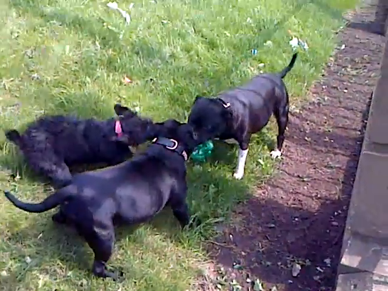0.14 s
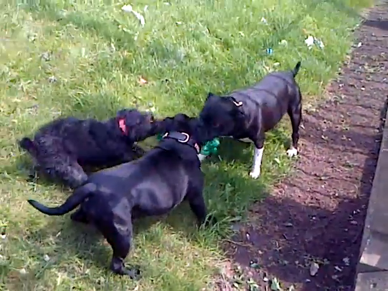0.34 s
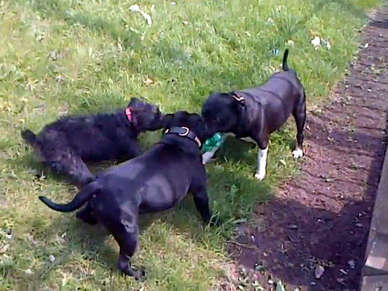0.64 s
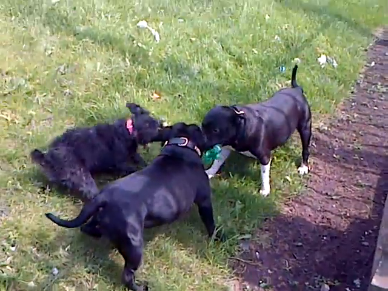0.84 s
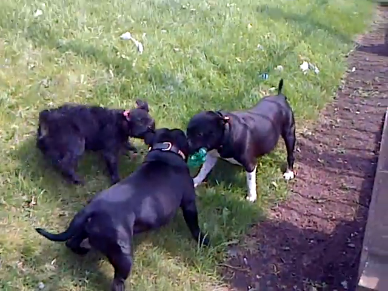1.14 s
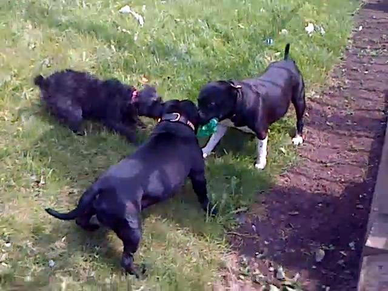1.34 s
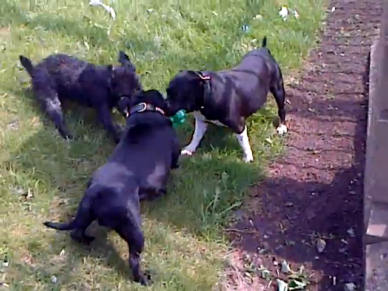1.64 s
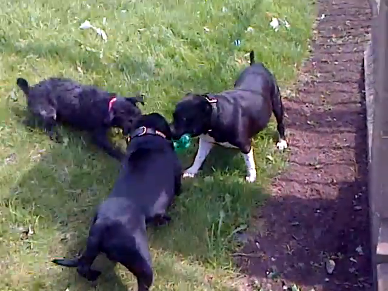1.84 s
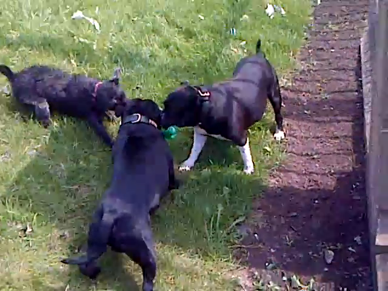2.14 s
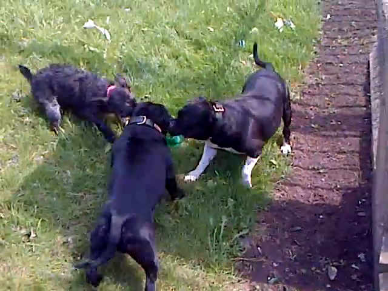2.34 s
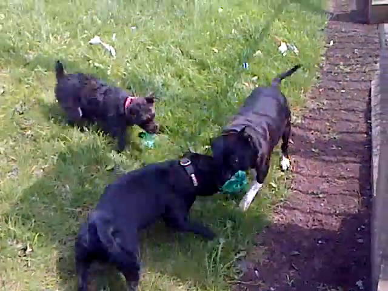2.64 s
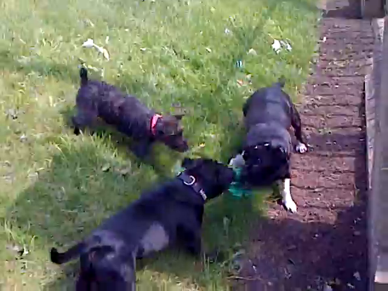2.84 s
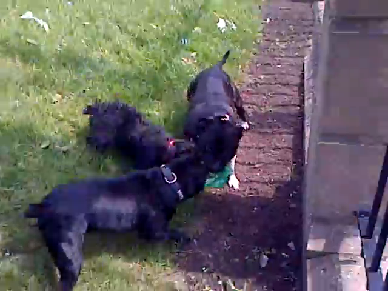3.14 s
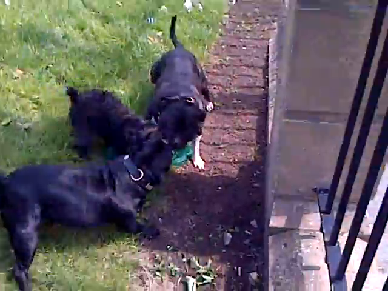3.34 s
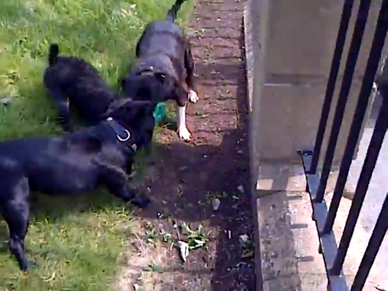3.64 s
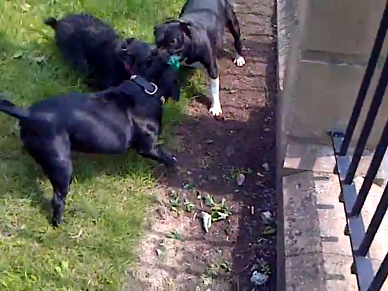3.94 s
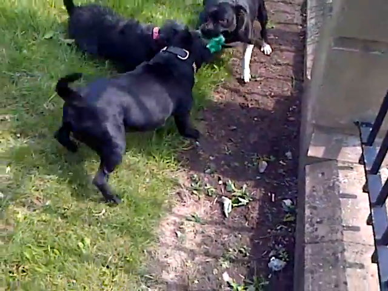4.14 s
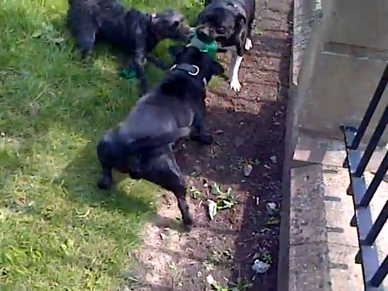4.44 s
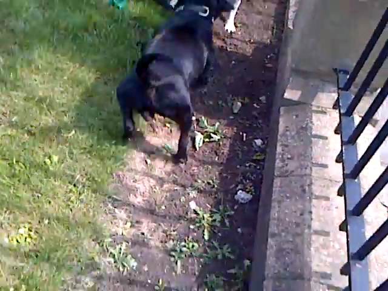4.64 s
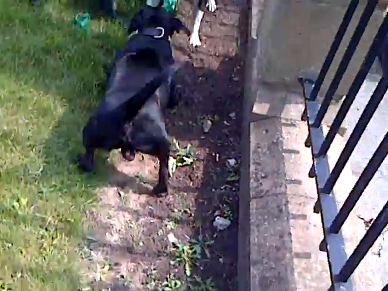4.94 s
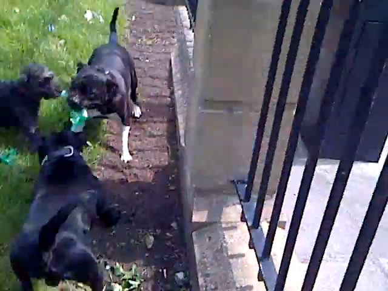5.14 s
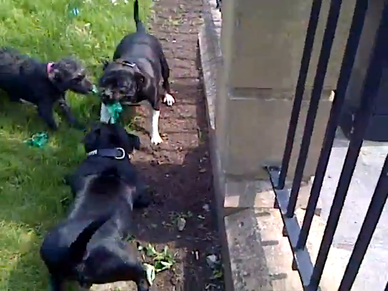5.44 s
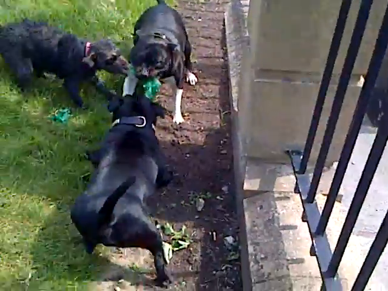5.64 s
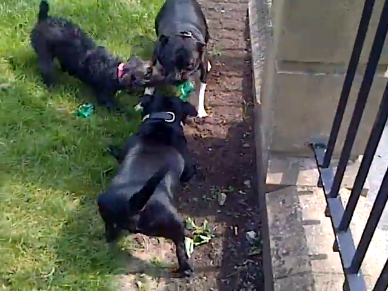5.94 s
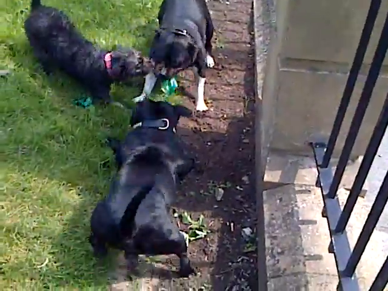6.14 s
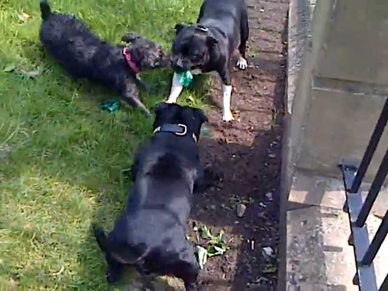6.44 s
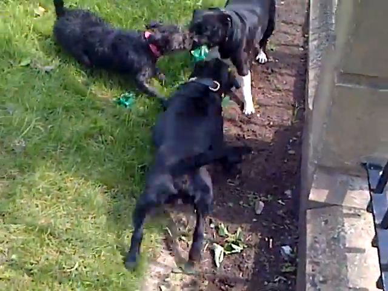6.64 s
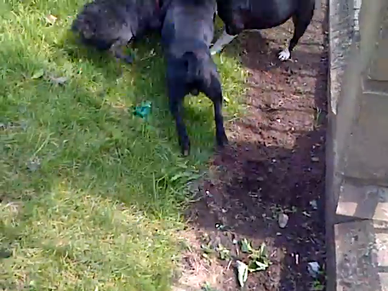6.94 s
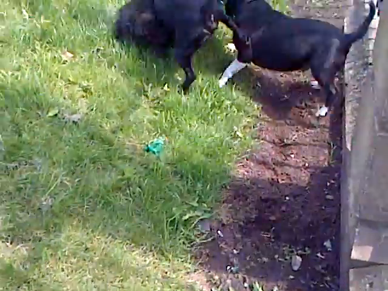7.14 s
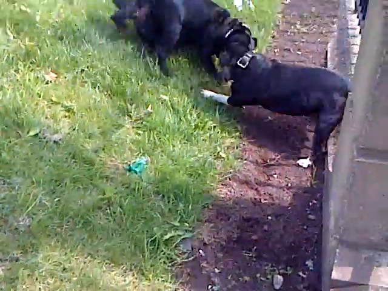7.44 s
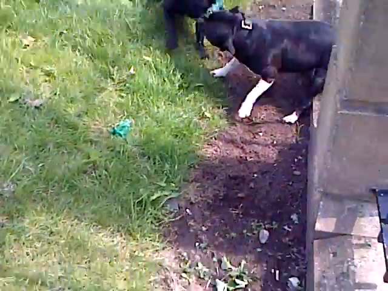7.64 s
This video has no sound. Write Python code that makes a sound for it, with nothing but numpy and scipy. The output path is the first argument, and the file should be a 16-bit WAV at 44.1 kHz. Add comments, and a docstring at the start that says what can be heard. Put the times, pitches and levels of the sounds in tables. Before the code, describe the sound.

Sharp plastic cracks and crinkles as dogs tug and chew a bottle, with low growls, soft paw thuds and a snort over traffic.

```python
"""Sharp plastic cracks and crinkle over a wash of road traffic, with low growls and a closing snort.
Three dogs tug and chew a bottle on a lawn by a stone wall. Each bite snaps dents that ring the thin
plastic; teeth scrape, paws thud. Growls are vocal-fold flaps in the throat, the snort is air in the nose.
A narrow-band microphone a few metres away overloads on the hardest cracks."""
import sys
import numpy as np
from scipy import signal
from scipy.io import wavfile
from scipy.ndimage import uniform_filter1d

SR = 44100
rng = np.random.default_rng(int(sys.argv[2]) if len(sys.argv) > 2 else 0)


def transcribe(signal):
    """Save signal, clipped to [-1, 1], as a 16-bit WAV file at the path in sys.argv[1]."""
    frames = np.atleast_2d(signal).T
    limited = np.clip(frames, -1, 1)
    pcm = np.round(limited * 32767).astype(np.int16)
    wavfile.write(sys.argv[1], SR, pcm)


N = 343980
SLIP_DRAWS = 11  # random numbers per slip: timing, sign, a bend for each of 9 rings


def gain_of(db):
    return 10 ** (np.asarray(db) / 20)


def unit_rms(x):
    return x / np.sqrt(np.mean(x ** 2) + 1e-20)


def log_interp(points, hz):
    f, value = np.transpose(points)
    return np.interp(np.log(hz + 1), np.log(f + 1), value)


def add(mix, start_s, sound):
    part = mix[round(start_s * SR):][:len(sound)]
    part += sound[:len(part)]


def filtered(x, hz, kind, order):
    return signal.sosfilt(signal.butter(order, np.clip(hz, 20, 20000), kind, fs=SR, output="sos"), x)


def resonate(x, hz, width_hz, stages=1):
    """Unity-gain resonance: shift hz to zero, smooth, shift back."""
    carrier = np.exp(2j * np.pi * np.cumsum(hz * np.ones(len(x))) / SR)
    pole = np.exp(-np.pi * width_hz / SR)
    for _ in range(stages):
        x = 2 * (carrier * signal.lfilter([1 - pole], [1, -pole], x / carrier)).real
    return x


def microphone(x):
    """Voice-band capsule: a low shelf either side of the band, then a steep top cut."""
    x = filtered(x, 191.4, "high", order=10) + gain_of(-30) * x
    x = filtered(x, 3340, "low", order=6) + gain_of(-18) * x
    return filtered(x, 7800, "low", order=16)


def traffic():
    """Tyre noise blending a dull and a hissing car, plus engine drone."""
    # background wash, ducking abruptly after the loudest crack and creeping back:
    # t/s, level/dB, hissing share/0-1
    background = [(0, -27.5, 0), (0.68, -25, 0), (.96, -29.5, 0.4), (1.3, -30.5, 0.6), (1.6, -29, 0.82),
                  (2.06, -23.5, 1), (2.65, -27.5, 0.6), (3.401, -31.5, 0.96), (3.751, -37.5, 0.6),
                  (4.408, -40.5, 1), (4.839, -44, 0.98), (5.399, -41.5, 1), (6.263, -45.5, 0.3),
                  (6.277, -63.5, 0.3), (6.901, -55.5, 0.98), (7.201, -47, 0.87), (7.8, -43, 0.5)]
    # dull car spectrum: f/Hz, density/dB
    dull_car = [(100, -13), (190, -17), (300, -7), (600, -7.5), (990, -6), (1300, -8.5), (2100, -10),
                (2800, -11), (3500, -28.5), (5800, -27.5), (7500, -67.5)]
    # hissing car spectrum: f/Hz, density/dB
    hissing_car = [(100, -10), (190, -21.5), (330, -5), (500, -12.5), (850, -10), (1500, -11.5),
                   (2900, -15.5), (4000, -17), (4700, -26.5), (5500, -33.5), (7500, -59)]
    # engine drone: f/Hz, width/Hz, level/dB re tyre noise
    engine = [(199.8, 11, -31), (326, 42, -16)]
    frames, hz = N // 128 + 5, np.fft.rfftfreq(512, 1 / SR)
    real, imag, patches, drifts = rng.standard_normal((frames, 257, 4)).T
    drifts = unit_rms(uniform_filter1d(uniform_filter1d(drifts, size=14, axis=1), size=8, axis=0))
    patches = unit_rms(uniform_filter1d(uniform_filter1d(patches, size=3, axis=0), size=36, axis=1))
    at_s, db, share = np.transpose(background)
    share = np.interp(np.arange(frames) * 128 / SR, at_s, share)
    dull_db, hiss_db = log_interp(dull_car, hz)[:, None], log_interp(hissing_car, hz)[:, None]
    colour = gain_of((1 - share) * dull_db + share * hiss_db)
    spectra = (real + 1j * imag) * colour / np.linalg.norm(colour, axis=0) * gain_of(2 * patches + drifts)
    tyres = unit_rms(signal.istft(spectra, nperseg=512, noverlap=384)[1][:N])
    drone = sum(gain_of(g) * unit_rms(resonate(rng.standard_normal(N), f, w)) for f, w, g in engine)
    return (tyres + drone) * gain_of(np.interp(np.arange(N) / SR, at_s, db))


def yard_echoes(x, t60_s=.063):
    """Sparse random-sign reflections from ground, wall and railings."""
    taps = np.zeros(8000)
    at = np.arange(120, 7980, 20) + rng.integers(0, 20, 393)
    taps[at] = rng.choice([-1., 1.], len(at)) * gain_of(-60 * at / SR / t60_s)
    return signal.oaconvolve(x, taps / np.linalg.norm(taps))[:N]


def paws(push_t60_s=.032, soil_t60_s=.13):
    """Each landing on turf: a dull push with a crumbly tail."""
    # landings: t/s, level/dB, f/Hz
    landings = [(0.458, -23.5, 326), (4.144, -23, 366), (4.16, -24, 257), (4.207, -17, 324),
                (4.235, -17.5, 354), (4.261, -20, 482), (6.834, -38, 596), (6.871, -39.5, 523),
                (7.352, -28, 443), (7.375, -23, 328), (7.484, -29, 353)]
    out, t = np.zeros(N), np.arange(2000) / SR
    soils = filtered(rng.standard_normal((len(landings), len(t))), 1100, "low", order=4)
    for (at_s, db, hz), soil in zip(landings, soils):
        push = np.sin(2 * np.pi * hz * t) * gain_of(-60 * t / push_t60_s)
        crumble = .38 * unit_rms(resonate(soil, hz, 500)) * gain_of(-60 * t / soil_t60_s)
        add(out, at_s, gain_of(db) * (push + crumble) * np.minimum(t / .0011, 1))
    return out


def vocal_folds(t, pulse_hz, breath, leak):
    """Uneven flaps, each passing a puff of noisy air."""
    jitter = .29 * unit_rms(uniform_filter1d(rng.standard_normal(len(t)), 300))
    cycles = np.cumsum(pulse_hz * (1 + jitter)) / SR
    flaps = np.diff(np.floor(cycles), prepend=0) * gain_of(3.9 * rng.standard_normal(len(t)))
    puffs = (leak + np.exp(-(cycles % 1) / .3)) * rng.standard_normal(len(t))
    return (1 - breath) * unit_rms(flaps) + breath * unit_rms(puffs)


def growls(swell_db=18):
    """Slow flaps ring one broad throat resonance behind clenched teeth."""
    # growls: t/s, length/s, mid level/dB, throat f/Hz
    calls = [(.3, 0.45, -34, 850), (1.949, 1, -27.5, 670), (6.941, 0.15, -48.5, 790)]
    out = np.zeros(N)
    for at_s, length_s, db, hz in calls:
        t = np.arange(0, length_s, 1 / SR)
        throat = resonate(vocal_folds(t, pulse_hz=110, breath=.6, leak=.5), hz, 380, stages=2)
        arch_db = -swell_db * (2 * t / length_s - 1) ** 2
        add(out, at_s, unit_rms(throat) * gain_of(db + arch_db) * signal.windows.tukey(len(t), .1))
    return out


def snort():
    """Fluttering blast through the nose; resonances rise as the nostrils flare."""
    # blast: t/s, level/dB, nostril opening/factor on f
    blast = [(7.574, -39, 0.51), (7.6, -25, 0.72), (7.624, -14, 0.98), (7.659, -12.5, 0.98),
             (7.686, -17.5, 1.21), (7.7, -27, 0.89), (7.731, -49, 0.64)]
    # nasal resonances: f/Hz, width/Hz, gain/dB
    formants = [(950, 420, -3.5), (1400, 820, -4), (2010, 270, 5.5), (2630, 320, 1), (4000, 310, -13)]
    at_s, db, opening = np.transpose(blast)
    out, t = np.zeros(N), np.arange(at_s[0], at_s[-1], 1 / SR)
    air = vocal_folds(t, pulse_hz=65, breath=1, leak=.7)
    opening = np.interp(t, at_s, opening)
    nose = sum(gain_of(g) * resonate(air, f * opening, w, stages=2) for f, w, g in formants)
    envelope = gain_of(np.interp(t, at_s, db)) * signal.windows.tukey(len(t), .1)
    add(out, at_s[0], unit_rms(filtered(nose, 5100, "low", order=6)) * envelope)
    return out


def scrapes():
    """Teeth rasp along the plastic: noise in one broad wall resonance."""
    # tooth strokes: t/s, length/s, level/dB, f/Hz
    strokes = [(1.624, 0.19, -35, 3000), (3.544, 0.039, -27, 3280), (3.65, 0.055, -25.5, 3200),
               (5.129, 0.15, -38, 3680), (6.1, 0.15, -36, 3370)]
    out = np.zeros(N)
    for at_s, length_s, db, hz in strokes:
        t = np.arange(0, length_s, 1 / SR)
        rasp = resonate(rng.standard_normal(len(t)), hz, 1100, stages=2)
        add(out, at_s, gain_of(db) * unit_rms(rasp) * signal.windows.tukey(len(t), .6))
    return out


def knocks(rise_s=.002, t60_s=.02):
    """Hard bites ring the bottle's air and wall together, sagging in pitch."""
    # hollow knocks: t/s, level/dB, f/Hz
    hits = [(2.513, -16, 885), (2.568, -3, 714), (4.101, -10, 795), (4.2695, -12, 890), (4.409, -6.5, 812),
            (5.2515, -10, 960), (5.2695, -16, 980), (5.287, -16.5, 960), (5.394, -22, 730),
            (5.683, -7, 795), (5.823, -12.5, 790), (5.9945, -5, 807), (6.167, -11.5, 740)]
    out, t = np.zeros(N), np.arange(1500) / SR
    for at_s, db, hz in hits:
        body = np.sin(2 * np.pi * hz * t * (1 - 4 * t))
        add(out, at_s, body * gain_of(db - 60 * t / t60_s) * np.minimum(t / rise_s, 1))
    return out


def snaps(leads_hz, focus_db_per_oct, draws, spread_s, bend_db=14, crunch_t60_s=.011):
    """Dents give way in quick slips that ring the wall; a row per snap, unit peak at the mic output."""
    # bottle wall modes: f/Hz, level/dB, t60/s
    wall_modes = [(907, 4, 0.0052), (1334, 1.5, 0.0048), (2555, 4.5, 0.0045), (3076, 3, 0.0071),
                  (3573, 3.5, 0.0082), (4250, 2, 0.0075), (5190, -13, 0.012), (5830, 0.5, 0.0023)]
    t, out = np.arange(600) / SR, np.zeros((len(draws), 1100))
    for sound, lead_hz, focus, slips in zip(out, leads_hz, focus_db_per_oct, draws):
        small = lead_hz > 3900  # quicker, less crunch
        lead_mode = (lead_hz, -3 if lead_hz < 1100 else 3, .009)
        hz, db, t60_s = np.transpose(wall_modes + [lead_mode])[:, :, None]
        db = db - focus * abs(np.log2(hz / lead_hz))
        noise = filtered(rng.standard_normal((len(slips), len(t))), max(3700, lead_hz), "low", order=8)
        crunch = noise * gain_of(-4 - 4 * small - 60 * t / crunch_t60_s)
        for k, (timing, side, *bend) in enumerate(slips):
            bend = np.array(bend)[:, None] - .5  # varies each ring's level and pitch
            decay = gain_of(db + bend_db * bend - 60 * t / t60_s)
            rings = decay * np.sin(2 * np.pi * hz * (1 + .2 * bend[::-1]) * t)
            slip = (rings.sum(axis=0) + crunch[k]) * np.minimum(t / .00056, 1)
            start_s = spread_s / (1 + small) * (k + timing * (k > 0)) / len(slips)
            add(sound, start_s, np.sign(side - .5) * gain_of(-2.5 * k) * slip)
    out = filtered(out, 750, "high", order=2)  # soft thin plastic: no bass, no sparkle
    out = filtered(out, 6200, "low", order=4)
    return out / abs(microphone(out)).max(axis=1, keepdims=True)


def crinkle(snaps_per_s=2200, squeeze_db_per_s=360, release_db_per_s=329):
    """Tiny random snaps, swelling into each bite and dying after it."""
    # jaw closures: t/s, level/dB
    bites = [(2.504, -18.5), (2.58, -23), (2.84, -18.5), (2.92, -22), (3.737, -11.5), (3.998, -24),
             (4.288, -26), (4.406, -29.5), (4.601, -29.5), (4.951, -30.5), (5.101, -30.5), (5.22, -32.5),
             (5.688, -32.5), (5.829, -31.5), (6.189, -31.5), (6.408, -52.5), (6.814, -44)]
    # tugging between bites: t/s, level/dB
    pull = [(2.4, -34), (2.7, -35.5), (3.0, -34.5), (3.3, -50.5), (5.15, -57), (6.2, -51), (6.3, -72),
            (6.92, -60.5), (6.98, -43), (7.8, -44)]
    sizes = gain_of(7.9 * np.minimum(rng.exponential(1, N), 4))
    impulses = sizes * (rng.random(N) < snaps_per_s / SR)
    kind, draws = rng.integers(0, 10, N), rng.random((10, 2, SLIP_DRAWS))
    shapes = snaps(1500 + 2200 * draws[:, 0, 0], np.full(len(draws), 1.5), draws, spread_s=.0055)
    crackle = sum(signal.oaconvolve(impulses * (kind == k), shape)[:N] for k, shape in enumerate(shapes))
    t = np.arange(0, N / SR, .002)
    pressure = gain_of(np.interp(t, *np.transpose(pull), left=-90))
    for at_s, db in bites:
        drop_db = np.maximum(squeeze_db_per_s * (at_s - t), release_db_per_s * (t - at_s))
        pressure = np.hypot(pressure, gain_of(db - drop_db))
    return unit_rms(crackle) * np.interp(np.arange(N) / SR, t, pressure)


def cracks():
    """Sharp peaks of four slips each: dents snapping in the bottle wall, then the snort's peak."""
    # dents; last row is the sharp peak of the closing snort: t/s, peak level/dB, lead ring f/Hz
    peaks = [(0.0086, -11, 3580), (0.3688, -24, 4100), (0.4298, -21.5, 4000), (0.586, -22, 4610),
             (0.758, -28, 4600), (1.327, -27.5, 5400), (1.5132, -12, 1540), (1.5608, -11.5, 1480),
             (2.4817, -19, 1560), (2.5005, -12, 2800), (2.5127, -4.5, 3060), (2.531, -5, 2010),
             (2.5675, -13, 2530), (2.5907, 0, 1520), (2.6264, -17.5, 2820), (2.6523, -17.5, 2850),
             (2.7552, -16.5, 2180), (2.8192, -2.5, 1520), (2.8267, -5.5, 2770), (2.8659, -13, 1720),
             (2.878, -7, 2750), (2.897, -7, 2090), (2.9223, -8.5, 1690), (2.9332, -7, 2820),
             (3.0178, -19, 2370), (3.075, -16.5, 2640), (3.214, -18.5, 1800), (3.2716, -12.5, 1640),
             (3.3652, -15, 2630), (3.4056, -10, 3180), (3.4474, -11.5, 2940), (3.4833, -14, 3160),
             (3.55, -14, 3130), (3.639, -9.5, 3760), (3.653, -13, 2780), (3.711, 1, 3200),
             (3.7214, -2, 2740), (3.741, -9.5, 3260), (3.7617, -2.5, 1140), (3.9173, -9.5, 2770),
             (3.9747, -5.5, 950), (3.9839, -6, 1400), (3.9946, -4.5, 2460), (4.0182, -4, 2630),
             (4.1002, -3.5, 3040), (4.1187, -11.5, 2890), (4.1303, -16, 1720), (4.145, -14, 2860),
             (4.224, -22.5, 3400), (4.2687, -9.5, 2900), (4.2764, -2.5, 1410), (4.2897, -9.5, 1880),
             (4.3017, -10.5, 2570), (4.353, -25.5, 3880), (4.3927, -21, 3170), (4.4085, -2.5, 3570),
             (4.439, -12, 3100), (4.451, -20, 2900), (4.5, -26.5, 3680), (4.5763, -5.5, 3940),
             (4.5944, -2.5, 1907), (4.613, -9.5, 2890), (4.736, -18, 1810), (4.746, -0.4, 1690),
             (4.771, -14.5, 1910), (4.839, -18, 3180), (4.9246, -13, 890), (4.938, -6, 1950),
             (4.955, -8, 4070), (4.977, -20.5, 2980), (4.9926, -17, 1810), (5.0803, -20, 3100),
             (5.099, 0, 3540), (5.1096, -13, 3020), (5.1308, -16, 1820), (5.2302, -6.5, 2940),
             (5.251, -16, 2900), (5.2692, -15.5, 3240), (5.2865, -9.5, 3070), (5.393, -20, 2930),
             (5.4149, -11.5, 3270), (5.5274, -23, 2700), (5.543, -5.5, 3160), (5.633, -22, 3000),
             (5.6665, -12.5, 3530), (5.6824, 0, 3440), (5.796, -23, 2870), (5.81, -14.5, 3070),
             (5.825, -11.5, 3350), (5.839, -11, 1660), (5.9547, -24, 3300), (5.962, -21, 3100),
             (5.9839, -20, 3280), (5.9947, -1, 3370), (6.1634, -12.5, 1620), (6.1708, -11.5, 3000),
             (6.199, -19, 3840), (6.231, 3, 3640), (6.707, -35, 3150), (6.7855, -38.5, 3250),
             (6.869, -38.5, 2480), (6.9517, -24.5, 2630), (7.056, -26.5, 1150), (7.073, -27.5, 1620),
             (7.13, -29, 3080), (7.167, -26, 3150), (7.2278, -23.5, 1210), (7.2395, -25, 2740),
             (7.2823, -20, 1310), (7.341, -16.5, 2450), (7.346, -20.5, 2270), (7.407, -22, 2700),
             (7.4746, -19.5, 2160), (7.546, -33.5, 2860), (7.559, -17, 2630), (7.659, -5.5, 2010)]
    out, draws = np.zeros(N), rng.random((len(peaks), 4, SLIP_DRAWS))
    times_s, db, hz = np.transpose(peaks)
    focus_db_per_oct = np.clip(-.15 * db, 1.5, 3)  # hard snaps shake the whole wall, weak ones a patch
    sounds = gain_of(db)[:, None] * snaps(hz, focus_db_per_oct, draws, spread_s=.005)
    for at_s, sound in zip(times_s, sounds):
        add(out, at_s, sound)
    return out


def scene():
    """Dogs and bottle with yard echoes, over traffic; mono."""
    near = cracks() + crinkle() + knocks() + paws() + growls() + snort() + scrapes()
    return (near + gain_of(-15.5) * yard_echoes(near) + traffic())[None]


def record(dry, overload=.7, rail=.86, band_hz=8400, edge_hz=16600):
    """Microphone, clipping amplifier, voice-band filter; peaks past the rail spray harsh treble."""
    swing = microphone(dry + gain_of(-54) * rng.standard_normal(dry.shape))
    band_fir = signal.firwin(255, band_hz, window=("kaiser", 11), fs=SR)
    clipped = signal.oaconvolve(np.clip(swing, -overload, overload), band_fir[None], "same")
    spray = filtered(np.clip(swing, -rail, rail) - swing, band_hz, "high", order=4)
    out = clipped + gain_of(-4.5) * spray + gain_of(-100) * rng.standard_normal(dry.shape)
    edge_fir = signal.firwin(511, edge_hz, window=("kaiser", 9), fs=SR)
    return signal.oaconvolve(out, edge_fir[None], "same")


dry = scene()
out = record(dry)
transcribe(out)
```